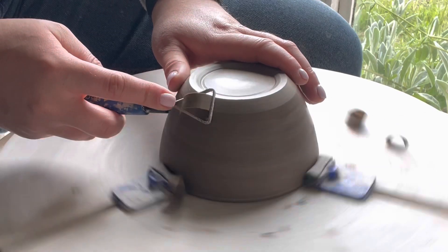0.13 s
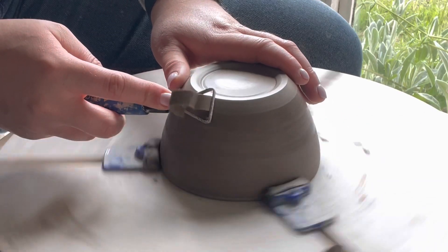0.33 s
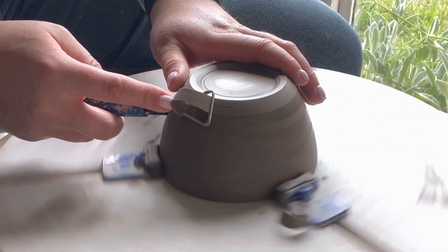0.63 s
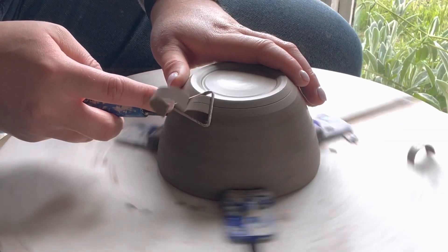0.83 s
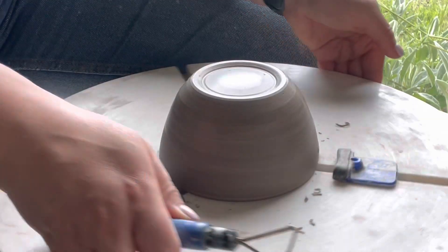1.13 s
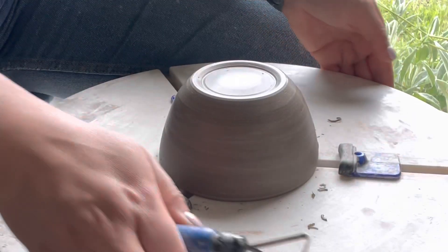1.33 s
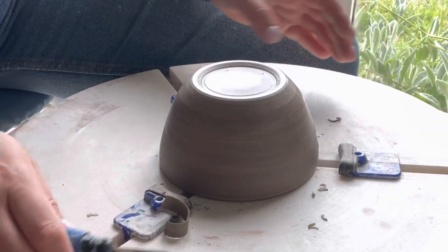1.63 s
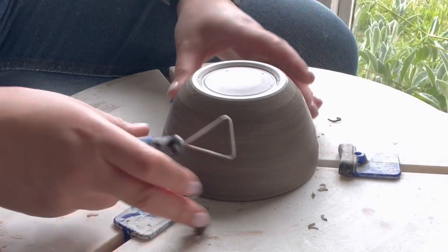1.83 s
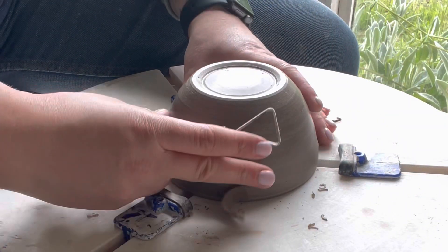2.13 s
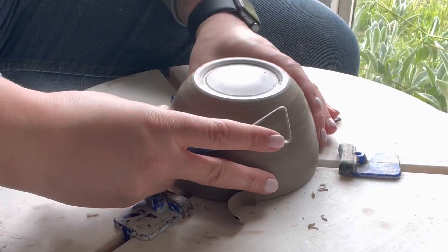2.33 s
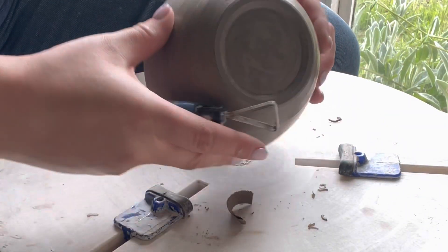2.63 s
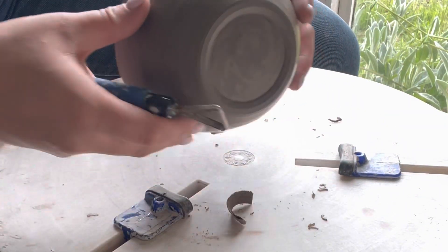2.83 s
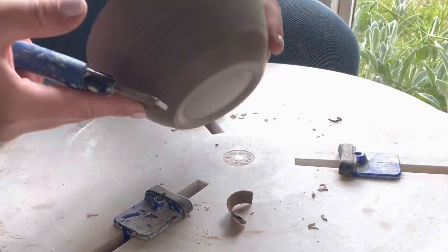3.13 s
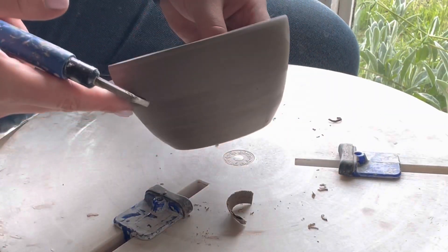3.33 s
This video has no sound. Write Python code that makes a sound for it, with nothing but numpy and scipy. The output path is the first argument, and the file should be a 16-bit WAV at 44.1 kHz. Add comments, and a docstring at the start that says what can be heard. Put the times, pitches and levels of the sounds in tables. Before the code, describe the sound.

Close-up pottery trimming: a blade rasps and ticks on turning clay, followed by a louder scrape on the wheel. A plastic clamp clacks, hands brush faintly and the bowl bumps as it is lifted, while distant engines hum.

```python
"""Trimming a bowl on the wheel

A loop tool shaves a spinning clay bowl, hissing at the blade and rasping in the bowl; then comes a
loud, gritty scrape that rings the stopping wheel head. A plastic clamp is knocked loose, hands brush
the clay, and the bowl bumps the wheel as it is lifted. Distant engines drone under the small studio."""
import sys
import numpy as np
from scipy import signal
from scipy.fft import rfft, irfft, next_fast_len
from scipy.io import wavfile
from scipy.ndimage import map_coordinates

SR = 44100
rng = np.random.default_rng(int(sys.argv[2]) if len(sys.argv) > 2 else 0)


def inscribe(sig):
    """Save sig as 16-bit PCM at rate SR to the path in sys.argv[1].

    A 1-D sig is mono; a 2-D sig holds one channel per row.
    Samples are clipped to [-1, 1] before scaling.
    """
    pcm = np.round(np.clip(np.atleast_2d(sig).T, -1, 1) * 32767)
    wavfile.write(sys.argv[1], SR, pcm.astype(np.int16))


N = 153468


def amp(db):
    return 10 ** (np.asarray(db) / 20)


def unit_rms(x):
    return x / np.sqrt(np.mean(x ** 2) + 1e-20)


def clock():
    return np.arange(N) / SR


def along(points, hz):
    """Read (frequency, value) points on a log axis."""
    freqs, values = np.transpose(points)
    return np.interp(np.log(hz + 1), np.log(freqs + 1), values)


def curves(rows):
    """An automation curve for each column after the time."""
    times, *columns = np.transpose(rows)
    return [np.interp(clock(), times, column) for column in columns]


def wobble(per_s):
    """A smooth random curve with per_s knots a second."""
    return map_coordinates(rng.standard_normal(int(N * per_s / SR) + 4), [clock() * per_s])


def swell(centre_s, half_s):
    """A bell-shaped envelope."""
    return np.exp(-((clock() - centre_s) / half_s) ** 2 / 2)


def bell(hz, centre_hz, octaves):
    """Gain of a band that is bell-shaped on a log axis."""
    return np.exp(-(np.log2((hz + 1) / centre_hz) / octaves) ** 2 / 2)


def filtered(x, response):
    """Shape x with a gain given as a function of frequency."""
    size = next_fast_len(N + SR // 2)
    return irfft(rfft(x, size) * response(np.fft.rfftfreq(size, 1 / SR)), size)[..., :N]


def coloured(x, eq, peaks=()):
    """Give x a broad EQ and narrow resonances, at rms 1."""
    def response(f):
        lift_db = sum(db / (1 + (2 * (f - hz) / width) ** 2) for hz, width, db in peaks)
        return amp(along(eq, f) + lift_db)
    return unit_rms(filtered(x, response))


def grains(per_s, scatter_db):
    """Tiny slips of random size at random moments."""
    hits = rng.random(N) < per_s / SR
    return hits * rng.standard_normal(N) * amp(scatter_db * rng.standard_normal(N))


# Engine pitch glides (time [s], first [Hz], second [Hz], third [Hz])
ENGINE_PITCH = [(0, 78.28, 61, 64.5), (0.92, 75.28, 59, 63.6), (0.941, 70.02, 54.6, 63.5),
                (2.002, 72.52, 56.13, 63.2), (3.48, 77.97, 60.39, 63.6)]
# Faders of two engines; the third holds steady (time [s], first [dB], second [dB])
ENGINE_FADERS = [(0, -40, -63), (.25, -41, -53), (.4, -45, -51), (.92, -42.5, -49.5), (.96, -48, -44),
                 (1.55, -46, -44), (1.75, -48, -51.5), (2.0, -43.5, -44.5), (2.6, -49.5, -45.5),
                 (3.48, -45.5, -46.5)]
# Harmonic balance of each engine (harmonic [number], first [dB], second [dB], third [dB])
ENGINE_HARMONICS = [(1, -0.5, -14.5, -2), (2, -14.5, 0, -4.5), (3, -27.5, -16.5, -12),
                    (4, -21.5, -24.5, -35)]
def engines(third_db=-49, flutter_db=1.6, drift_rad=0.17):
    """Three distant engines at shifting speeds beat against each other."""
    out = np.zeros(N)
    levels = curves(ENGINE_FADERS) + [third_db]
    balances = np.transpose(ENGINE_HARMONICS)[1:]
    for hz, level, harmonics in zip(curves(ENGINE_PITCH), levels, balances):
        phase = 2 * np.pi * np.cumsum(hz) / SR + drift_rad * wobble(7)
        for k, db in enumerate(harmonics, 1):
            gain = np.sqrt(2) * amp(level + db + flutter_db * wobble(5.99))
            out += gain * np.sin(k * phase + 2 * np.pi * rng.random())
    return out


# Bass-heavy EQ of the background bed (frequency [Hz], gain [dB])
BED_EQ = [(25, -24), (40, 3.5), (130, 6), (300, -4.5), (420, -12.5), (600, -17), (800, -24.5),
          (1000, -24.5), (1500, -32.5), (1950, -25), (2300, -28), (2900, -40), (3900, -37.5), (4700, -47.5),
          (12000, -56.5)]
# Ride on the air above the rumble, lowest after the scrape (time [s], gain [dB])
AIR_RIDE = [(.9, 7), (1.4, 0.5), (2.1, 2.5)]
def studio_bed(level_db=-51.5, air_from_hz=650):
    """Rumble and faint air of the studio, narrow in the bass and wider above."""
    mid, side = (coloured(rng.standard_normal(N), BED_EQ) for _ in range(2))
    # Stereo spread (frequency [Hz], side gain [dB])
    spread = [(100, -31.5), (300, -12), (700, 1.5), (2000, -6), (8000, -6.5)]
    side = filtered(side, lambda f: amp(along(spread, f)))
    bed = amp(level_db) * np.array([mid + side, mid - side])
    rumble = filtered(bed, lambda f: f < air_from_hz)
    return rumble + amp(curves(AIR_RIDE)[0]) * (bed - rumble)


# Faders of the cut (time [s], rasp [dB], hiss [dB], fizz [dB])
CUT_FADERS = [(0, -58, -68.5, -67.5), (.12, -60, -67, -66.5), (.18, -60, -62, -72.5),
              (.27, -60, -65, -74.5), (.35, -57, -67.5, -66), (.5, -58.5, -67.5, -68),
              (.56, -55.5, -61.5, -68.5), (.65, -50, -61, -77.5), (.75, -64.5, -62.5, -73.5),
              (.86, -52.5, -67, -63.5), (.915, -51.5, -56.5, -64), (.98, -120, -120, -120)]
# EQs of the hollow rasp, bright hiss and top fizz (frequency [Hz], gain [dB])
RASP_EQ = [(100, -18), (200, -5), (285, 2.5), (350, -10), (450, -28.5), (650, -6), (730, -19.5), (810, -8),
           (950, -21), (1200, -15), (1550, -23), (2400, -20), (3200, -31.5), (6000, -45)]
HISS_EQ = [(1500, -4.5), (3200, -1.5), (6400, 5.5), (8000, -5.5), (12000, -1)]
FIZZ_EQ = [(3000, -36), (6000, -8), (9200, -2.5), (11400, 3), (12200, -23), (13000, -22)]
# Resonances of the clay bowl and the steel loop (frequency [Hz], width [Hz], boost [dB])
BOWL_RESONANCES = [(833, 26, 2.5), (1167, 32, 7.5), (1478, 45, 11)]
LOOP_RESONANCES = [(5660, 300, 3), (9870, 320, 6.5)]
def trimming():
    """The loop peels a ribbon of clay: fine grains hiss and fizz at the blade and rasp in the bowl."""
    rasp_db, hiss_db, fizz_db = curves(CUT_FADERS)
    coarse = grains(per_s=1200, scatter_db=1.0)
    rasp = coloured(coarse, RASP_EQ, BOWL_RESONANCES) * amp(rasp_db + 2.43 * wobble(35.25))
    fine = [grains(per_s=7000, scatter_db=2) * amp(1.3 * wobble(60)) for _ in range(2)]
    hiss = coloured(fine[0], HISS_EQ, LOOP_RESONANCES) * amp(hiss_db)
    fizz = coloured(fine[1], FIZZ_EQ, LOOP_RESONANCES) * amp(fizz_db)
    return rasp + hiss + fizz


# Hits of tool, clamp and bowl, with each layer's fader ahead of its trim
# (time [s], thud [dB], ring [dB], clack [dB], click [dB], clack centre [Hz])
KNOCK_CUES = [(.151, -49, -52, -46.5, -51, 1480), (.465, -62, -59, -39.5, -59, 1390),
              (.63, -44, -53, -52.5, -59, 1400), (.802, -54, -52, -41.5, -62, 1660),
              (.819, -51, -52, -59, -56, 1900), (1.05, -34, -37.5, -32, -47, 1510),
              (1.588, -43.5, -42, -41, -49, 1960), (1.595, -38.5, -40.5, -39.5, -59, 1350),
              (1.613, -39, -45, -58, -68, 1290), (1.666, -42.5, -53, -41, -56, 1800),
              (1.866, -50, -64, -52, -52, 1900), (2.14, -48, -39, -36.5, -68.5, 800),
              (2.147, -52, -45, -39.5, -62.5, 1440), (2.385, -52, -54, -60, -77, 1390),
              (2.409, -42.5, -56.5, -65, -72, 1400)]
# Ringing modes of wheel head and bowl (frequency [Hz], gain [dB], decay T60 [s])
RING_MODES = [(251, -8, 0.15), (585.6, -2.5, 0.068), (648, -1.5, 0.04), (751, -1.5, 0.05),
              (854, -7.5, 0.067), (1210, 1, 0.059), (1339, -2.5, 0.077), (1537, 2, 0.047),
              (1832, 1.5, 0.044)]
# EQs of the dull thud and the crisp click (frequency [Hz], gain [dB])
THUD_EQ = [(110, -35), (240, 9), (420, 1.5), (570, 0), (800, -6.5), (1400, -14), (3000, -70)]
CLICK_EQ = [(1500, -17), (3300, -2.5), (6000, -2), (9000, -17), (13000, -13.5)]
def knocks(attack_s=0.0017, thud_t60=0.095, clack_t60=0.079, click_t60=0.033, clack_octaves=0.49):
    """Each contact rings the wheel head and bowl, with a dull thud, a dry clack and a click."""
    out, t = np.zeros(N + SR), np.arange(SR // 3) / SR
    thud_noise, click_noise = (coloured(rng.standard_normal(N), eq) for eq in (THUD_EQ, CLICK_EQ))
    for start, thud_db, ring_db, clack_db, click_db, clack_hz in KNOCK_CUES:
        span = slice(round(start * SR), round(start * SR) + len(t))
        clack_noise = filtered(rng.standard_normal(N), lambda f: bell(f, clack_hz, clack_octaves))
        ring = np.zeros(len(t))
        for hz, db, t60 in RING_MODES:
            # Low modes follow the ring fader; high ones belong to the clack.
            drive = amp(ring_db) if hz < 1000 else amp(clack_db - 8.5) * bell(hz, clack_hz, clack_octaves)
            decay = amp(db + rng.normal(0, 1) - 60 * t / t60)
            ring += drive * decay * np.sin(2 * np.pi * (hz * t + rng.random()))
        thud = amp(thud_db - 8.5 - 60 * t / thud_t60) * thud_noise[span]
        clack = amp(clack_db - 9.5 - 60 * t / clack_t60) * unit_rms(clack_noise)[span]
        click = amp(click_db - 60 * t / click_t60) * click_noise[span]
        out[span] += (ring + thud + clack + click) * (1 - np.exp(-t / attack_s))
    return out[:N]


# Ticks during the cut (time [s], level [dB])
SPECK_CUES = [(.317, -55), (0.524, -63), (0.566, -56.5), (.67, -54.5), (0.707, -59), (.8525, -58.5)]
def specks(t60=0.024):
    """Hard specks in the clay tick against the steel loop."""
    t = clock()
    envelope = sum((t >= start) * amp(db - 60 * np.abs(t - start) / t60) for start, db in SPECK_CUES)
    return envelope * coloured(rng.standard_normal(N), HISS_EQ, LOOP_RESONANCES)


# Faders of the scrape (time [s], wheel head [dB], grit [dB])
SCRAPE_FADERS = [(.93, -110, -110), (.942, -47.5, -53), (.958, -39, -44.5), (.98, -37, -40),
                 (1.06, -36, -39), (1.11, -37.5, -41.5), (1.165, -40, -43.5), (1.2, -43.5, -46.5),
                 (1.25, -54.5, -64.5), (1.3, -72, -76.5), (1.42, -110, -110)]
# EQs of the wheel head's body and the grit's bright edge (frequency [Hz], gain [dB])
HEAD_EQ = [(100, -30), (220, -1), (320, -0.5), (460, -11.5), (570, 4.5), (740, -0.5), (850, -3.5),
           (980, -15), (1150, -2.5), (1330, -11), (1550, -5.5), (2200, -7), (2500, -15.5), (3500, -22.5),
           (7000, -64)]
GRIT_EQ = [(1200, -34), (2700, -4.5), (4000, 1.5), (6500, 0.5), (11000, -9), (13200, -18)]
# Resonances of the wheel head (frequency [Hz], width [Hz], gain [dB])
HEAD_RESONANCES = [(261.5, 20, 3.5), (590, 28, 1.5), (658, 16, -1.5), (780, 15, 6), (1139, 11, 6.5),
                   (1762, 17, 12), (2150, 25, 4.5), (2740, 31, 9), (4530, 20, 5.5), (5500, 46, 3.5)]
# Tiny squeals (peak time [s], half length [s], pitch [Hz], level [dB])
SQUEAL_CUES = [(1.053, .006, 1520, -39), (1.135, .004, 2162, -35.5), (1.148, 0.01, 2243, -34.5)]
def scrape(squeal_octave_db=-7.5, squeal_rough_rad=0.38):
    """Dry grit judders over the wheel head, rings it, and now and then catches in a squeal."""
    head_db, grit_db = curves(SCRAPE_FADERS)
    slips = grains(per_s=22000, scatter_db=0.5) * amp(0.86 * wobble(260))
    out = amp(head_db) * coloured(slips, HEAD_EQ, HEAD_RESONANCES)
    out += amp(grit_db) * coloured(slips, GRIT_EQ, HEAD_RESONANCES)
    for centre_s, half_s, hz, db in SQUEAL_CUES:
        phase = 2 * np.pi * hz * clock() + squeal_rough_rad * wobble(400)
        squeal = np.sin(phase) + amp(squeal_octave_db) * np.sin(2 * phase)
        out += amp(db) * swell(centre_s, half_s) * squeal
    return out


# Soft hand strokes (peak time [s], half length [s], level [dB], band centre [Hz])
BRUSH_CUES = [(1.323, .02, -71, 4600), (1.394, 0.042, -70, 5100), (1.554, .05, -74, 5230),
              (1.627, 0.055, -69, 4440), (1.822, 0.018, -70.5, 6000), (1.9, 0.034, -65.5, 5250),
              (2.07, 0.023, -70, 10800), (2.18, 0.083, -79, 4770), (2.401, 0.018, -75.5, 3700),
              (2.57, 0.04, -79.5, 4200), (2.844, .12, -88, 8000), (3.18, 0.04, -78, 12800)]
def brushes(octaves=0.74):
    """Hands slide over clay and cloth in soft swells of fine grains."""
    out = np.zeros(N)
    for centre_s, half_s, db, hz in BRUSH_CUES:
        friction = filtered(grains(per_s=8900, scatter_db=-5.5), lambda f: bell(f, hz, octaves))
        out += amp(db) * swell(centre_s, half_s) * unit_rms(friction)
    return out * amp(0.86 * wobble(70))


# Far-off whines (peak time [s], half length [s], pitch [Hz], level [dB])
WHINE_CUES = [(2.213, 0.37, 362, -66), (2.698, 0.36, 443, -67.5), (3.11, 0.22, 963, -74),
              (3.305, 0.3, 304.7, -59.5)]
def whines(rough_rad=0.68):
    """Faint, unsteady tones rise out of the background and sink back."""
    out = np.zeros(N)
    for centre_s, half_s, hz, db in WHINE_CUES:
        envelope = np.sqrt(2) * amp(db + 2.2 * wobble(14)) * swell(centre_s, half_s)
        out += envelope * np.sin(2 * np.pi * hz * clock() + rough_rad * wobble(45))
    return out


# Reverb time of the studio (frequency [Hz], decay T60 [s])
REVERB_DECAY = [(150, 0.15), (1000, 0.37), (4000, 0.26), (12000, 0.18)]
# EQ on the reverb return (frequency [Hz], gain [dB])
REVERB_EQ = [(120, -35.5), (400, 2), (650, 2), (1500, -7), (2800, 5.5), (4500, -8.5)]
# Stereo spread of the direct sound (frequency [Hz], side gain [dB])
TREBLE_SPREAD = [(7000, -49.5), (8500, 1.5), (10000, -6.5), (12000, 11)]
def room(x, send_db, smear_s=0.0032):
    """The direct sound, wide in the top treble, with a separate short tail in each ear."""
    hz, t, noise = signal.stft(rng.standard_normal((2, SR // 2)), SR, nperseg=256)
    decay = amp(-60 * t / along(REVERB_DECAY, hz)[:, None])
    tail = signal.istft(noise * decay, SR, nperseg=256)[1]
    wet = signal.fftconvolve(x[None], tail / np.linalg.norm(tail[0]), axes=1)[:, :N]
    wet = filtered(wet, lambda f: amp(send_db + along(REVERB_EQ, f)))
    smear = rng.standard_normal(SR // 50) * np.exp(-np.arange(SR // 50) / SR / smear_s)
    side = signal.fftconvolve(x, smear / np.linalg.norm(smear))[:N]
    side = filtered(side, lambda f: amp(along(TREBLE_SPREAD, f)))
    return np.array([x + side, x - side]) + wet


def scene():
    """Close work at the wheel over the background, with more reverb on the knocks."""
    friction = room(trimming() + specks() + scrape() + brushes(), send_db=-8.5)
    impacts = room(knocks(), send_db=-5)
    return friction + impacts + engines() + whines() + studio_bed()


def record(dry):
    """The whole mix dips briefly just before the scrape, and a steep low-pass trims the top."""
    dip_at_s, dip_half_s, dip_db = 0.932, 0.017, -11.5
    cutoff_hz = 12900
    dip = amp(dip_db * np.exp(-((clock() - dip_at_s) / dip_half_s) ** 2))
    return filtered(dry * dip, lambda hz: hz < cutoff_hz)


dry = scene()
out = record(dry)
inscribe(out)
```